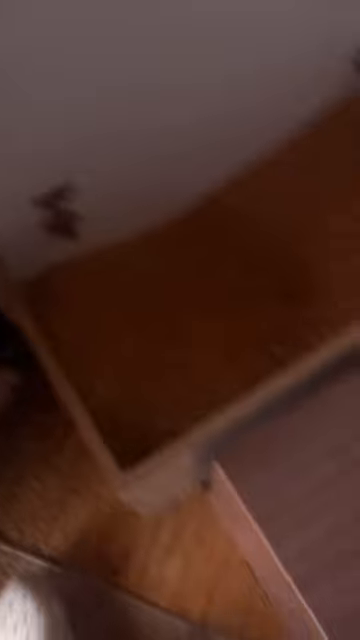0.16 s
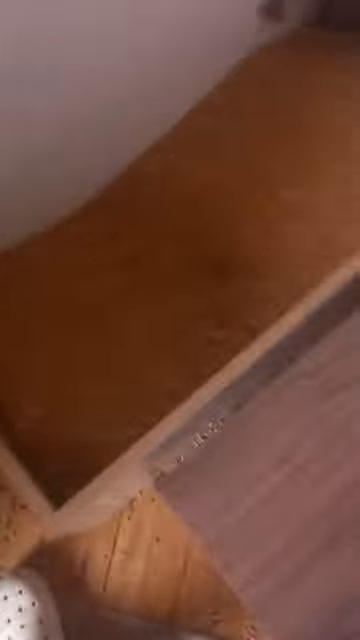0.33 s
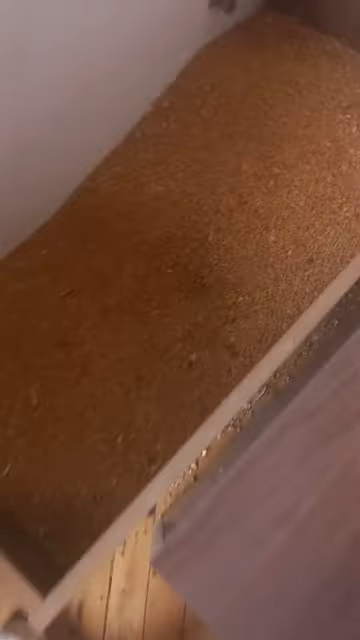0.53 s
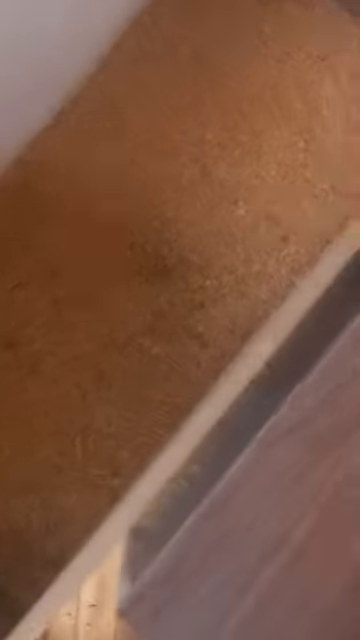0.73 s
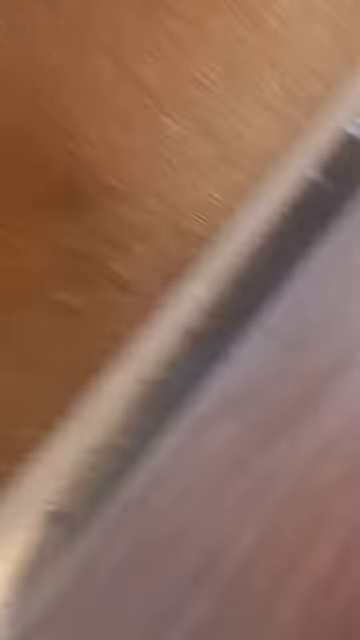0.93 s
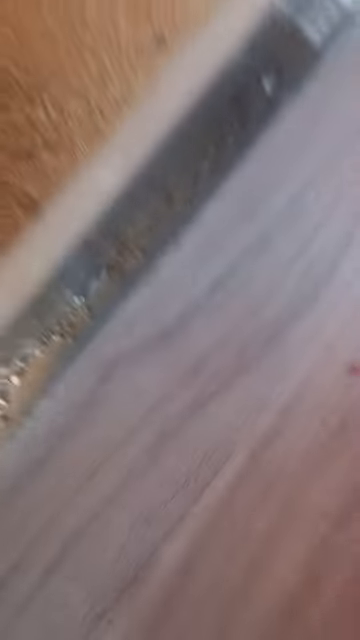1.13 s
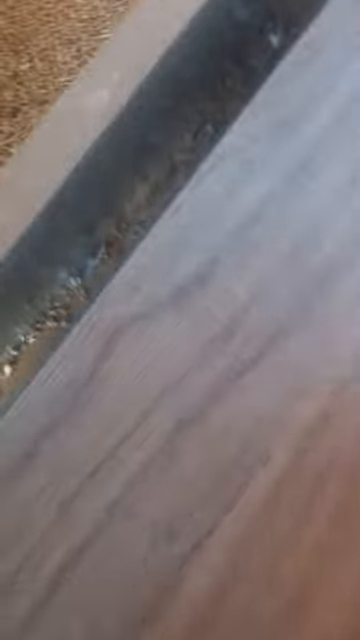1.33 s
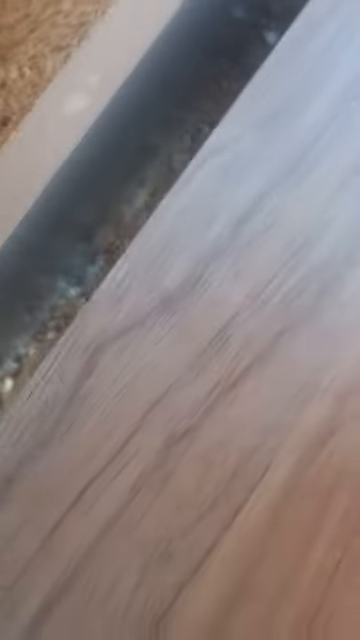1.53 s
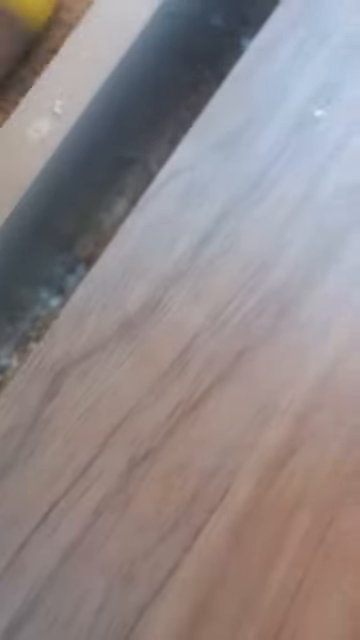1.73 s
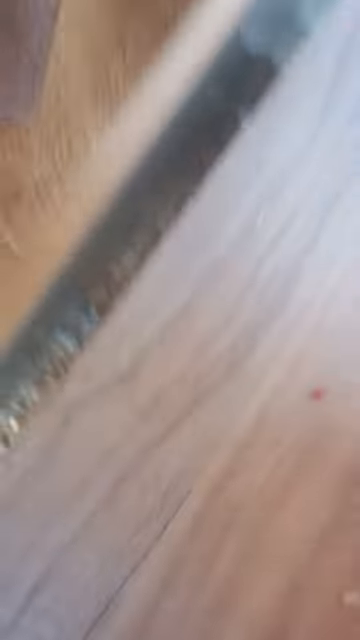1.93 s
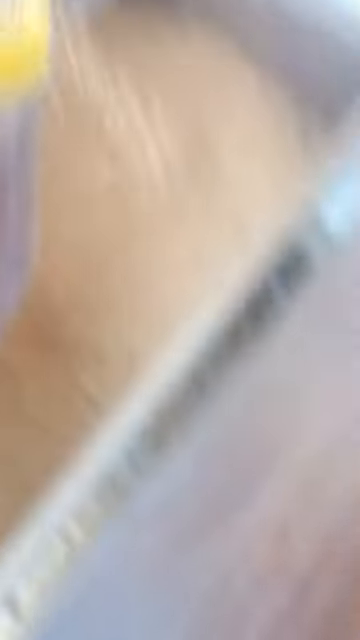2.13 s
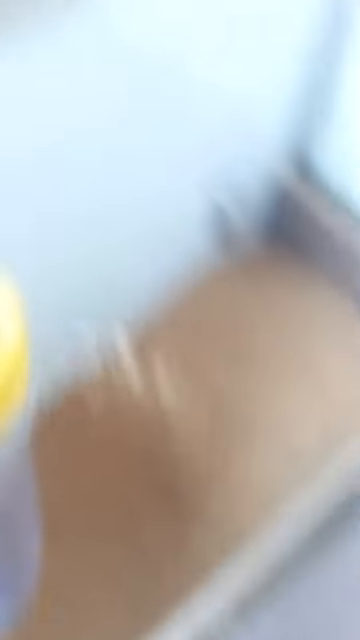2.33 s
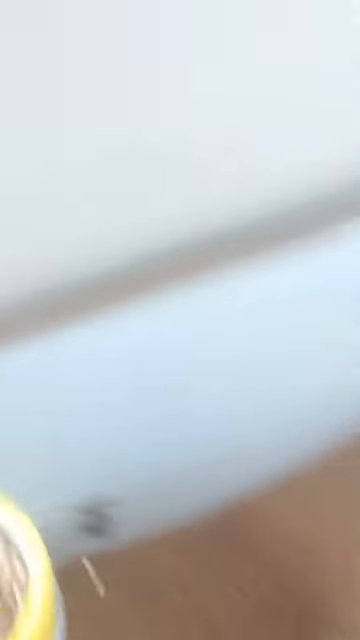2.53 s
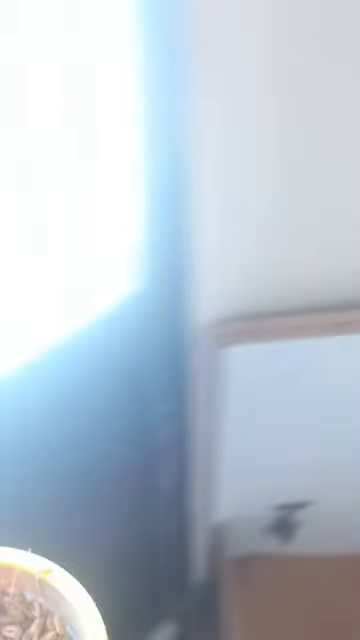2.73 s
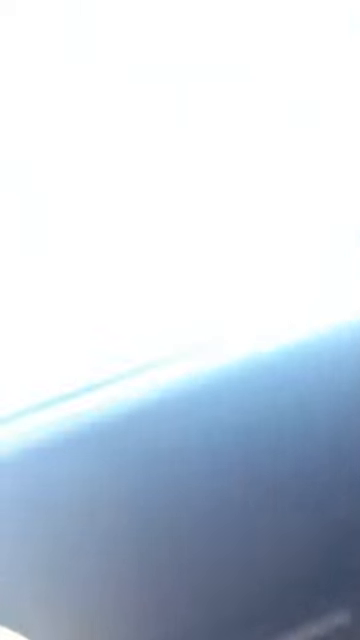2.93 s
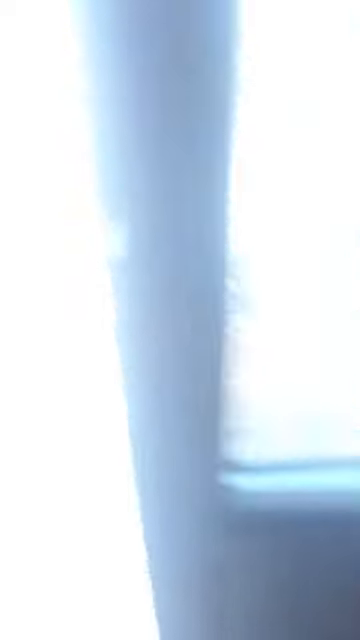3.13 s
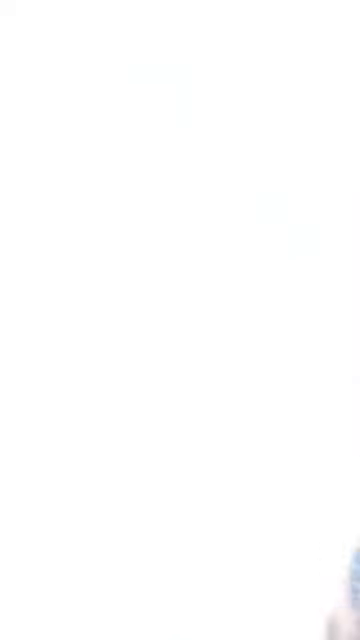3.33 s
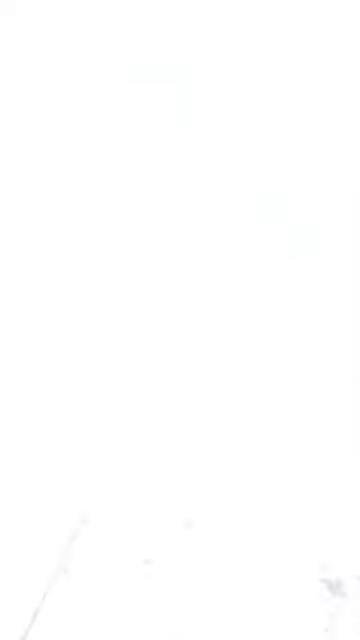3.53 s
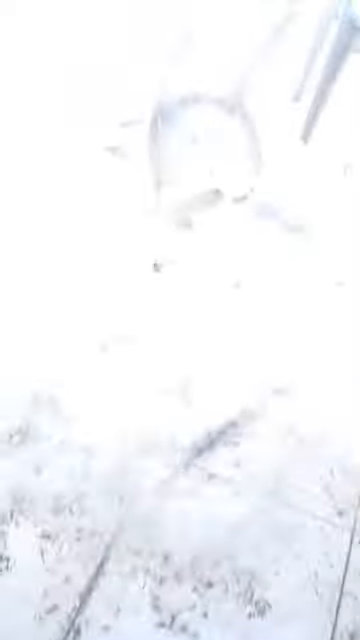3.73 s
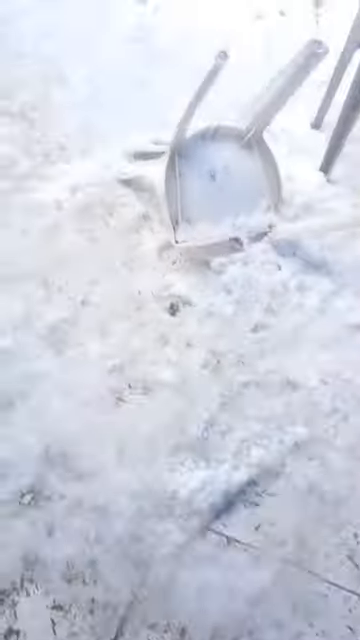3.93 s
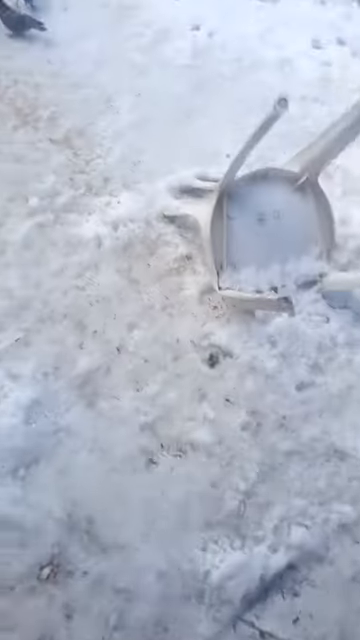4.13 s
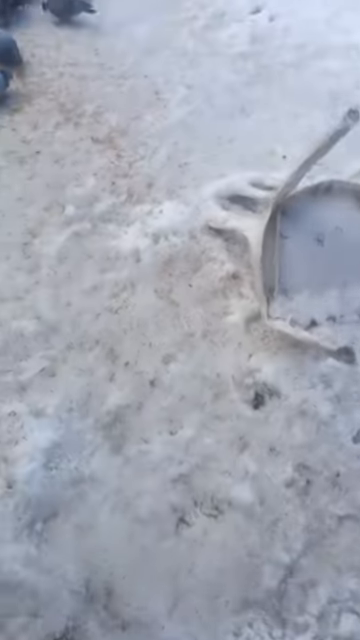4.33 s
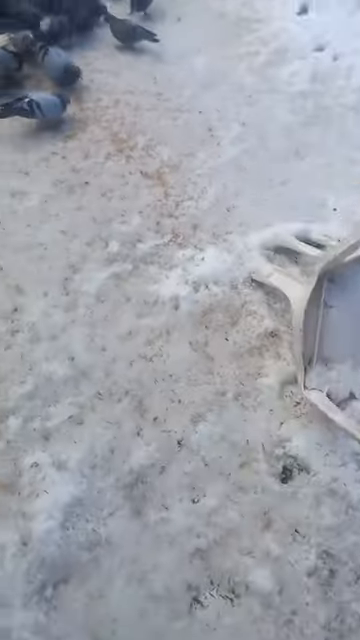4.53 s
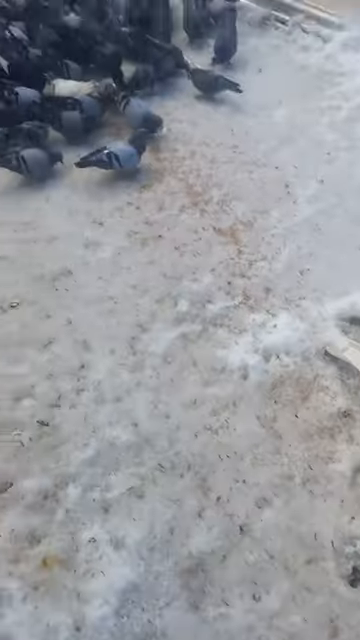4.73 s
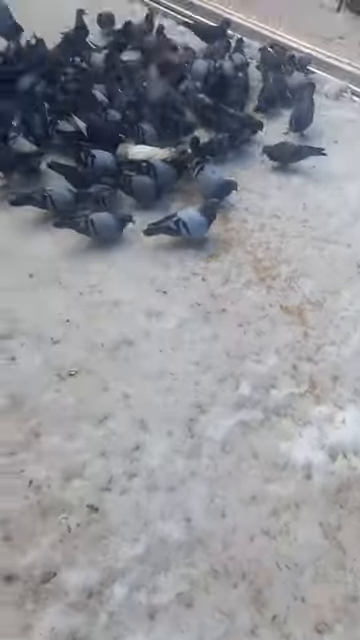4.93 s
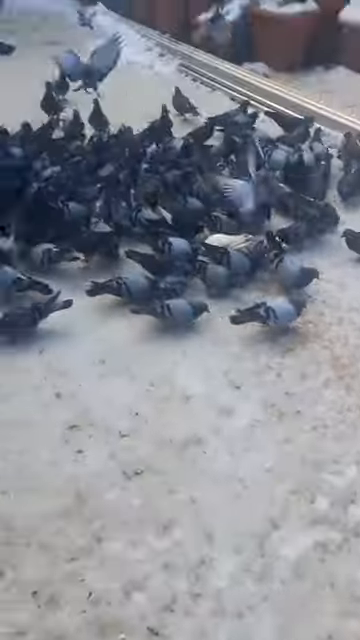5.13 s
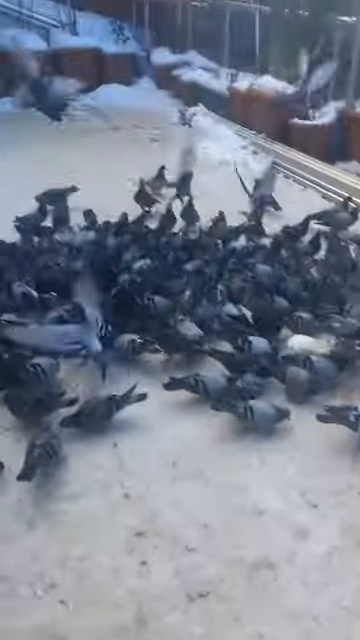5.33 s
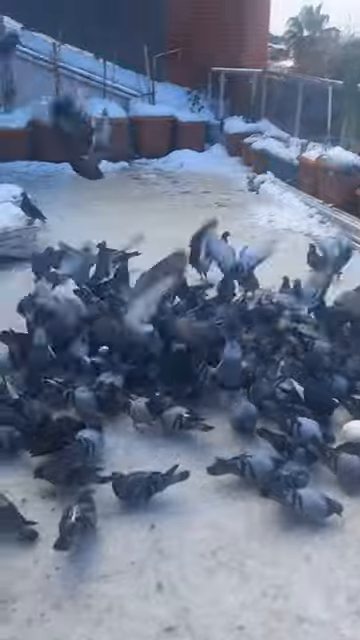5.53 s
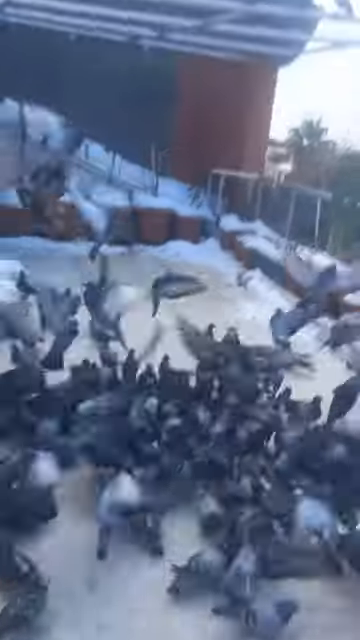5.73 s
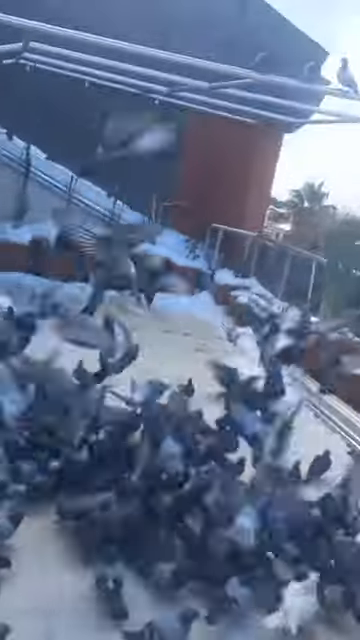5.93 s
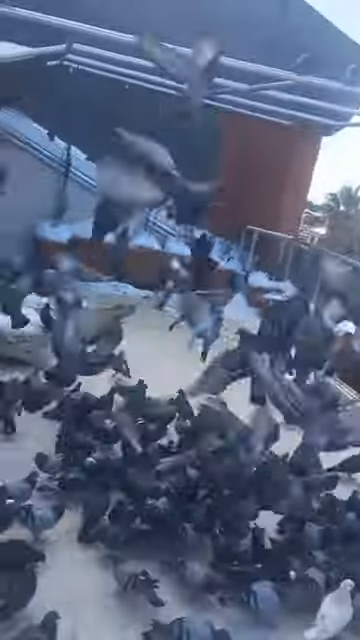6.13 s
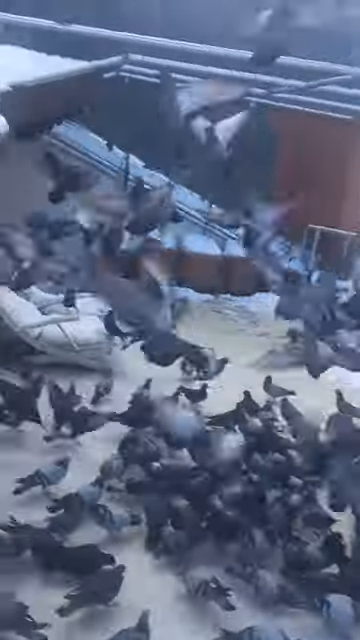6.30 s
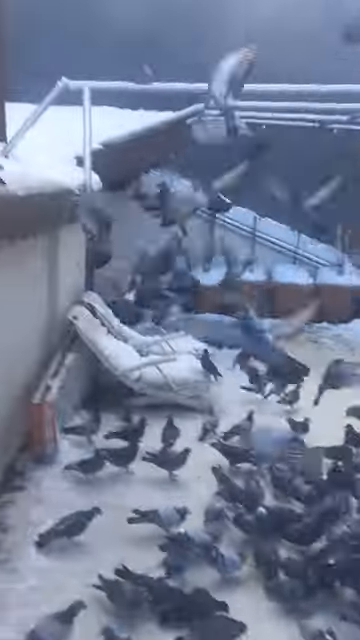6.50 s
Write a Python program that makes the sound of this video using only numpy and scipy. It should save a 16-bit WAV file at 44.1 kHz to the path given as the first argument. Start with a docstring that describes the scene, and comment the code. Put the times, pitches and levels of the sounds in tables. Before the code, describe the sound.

A cup scoops grain, and after footsteps and a door knock, a flock of pigeons bursts into flight on a terrace.

```python
"""Clothes brush, light knocks ring thinly and a wooden floor thuds; then a cup plunges into a bin of grain,
kernels hissing and rattling against its wall. The person holding the phone steps onto a snowy terrace,
the distant town grows louder and the door knocks once. Feeding pigeons stir, a few wings clap, then dozens
take off together: downstrokes thump the air, feathers swish and wing tips crack between house walls."""
import sys
import numpy as np
from scipy import signal
from scipy.fft import rfft, irfft, next_fast_len
from scipy.io import wavfile
from scipy.ndimage import uniform_filter1d

SR = 44100
rng = np.random.default_rng(int(sys.argv[2]) if len(sys.argv) > 2 else 0)


def persist_wave(psi):
    """Save psi, clipped to +-1, as 16-bit WAV."""
    counts = np.round(np.clip(psi, -1, 1) * 32767).astype(np.int16)
    wavfile.write(sys.argv[1], SR, np.atleast_2d(counts).T)


N = 293869
TIME = np.arange(N) / SR
KERNEL_WIDTH_HZ = 1000  # bandwidth of a rattling kernel

# midrange rub of feather vanes: freq_hz, level_db
RUB_COLOUR = [(150, -40), (400, -9), (800, -10.5), (1150, -6), (1560, -2.5), (2000, -5.5), (2700, -9.5),
              (4500, -10.5), (8000, -29.5)]
# bright top of quill cracks and hiss: freq_hz, level_db
BRIGHT_COLOUR = [(1500, -38.5), (3500, -6), (7000, -1.5), (10000, -5.5), (16000, -3)]


def flock(stir_s=4.42, alarm_s=5.378, spread_s=0.35, settle_s=0.45, stir_db=-42.5, burst_db=-20.5,
          flight_db=-28):
    """Every downstroke shoves air and swishes the vanes; quills flick, and airborne feathers whirr."""
    # body of the pushed air: freq_hz, level_db
    air_colour = [(21, -34), (35, -7.5), (98, 1.5), (145, 0.5), (194, -5.5), (299, 0.1), (385, -1.1),
                  (437, -7.5), (615, -6.5), (1110, -16), (1310, -16.5), (1600, -16), (1980, -21),
                  (2290, -27.5), (2600, -24.5), (3380, -42), (5720, -120)]
    # sheen of rustling feathers: freq_hz, level_db
    feather_colour = [(700, -18), (1200, 13.5), (1600, 11), (2050, 6.5), (2700, 5.5), (4000, 7.5),
                      (7000, 3.5), (10000, -1), (13000, 6), (16000, -3)]
    # alarm spreads through the shuffling birds, peaks, then eases into steady flight
    effort_db = (burst_db - stir_db) * ramp(alarm_s, spread_s)
    effort_db += (flight_db - burst_db) * ramp(alarm_s + spread_s, settle_s)
    lull_db = -6 * swell(5.15, 0.093)  # they freeze briefly before they go
    air_gain = undb(stir_db + effort_db)
    rustle_gain = undb(-51 + 0.76 * effort_db + lull_db)

    strokes = wingbeats()
    swish = stroke_envelope(strokes, swing_s=0.0065)
    pushes = ports(np.array([strokes, strokes * rng.standard_normal(N)]))
    pulses = unit(colour(pushes, air_colour)) * undb(-6)
    rush = unit(colour(noise() * swish, air_colour)) * undb(-4)
    vanes = unit(noise() * undb(4 * rng.standard_normal(N))) * swish * undb(-1)
    quills = noise() * stroke_envelope(strokes * (rng.random(N) < .3), swing_s=0.0029) * undb(-7)
    feathers = colour(vanes + quills, feather_colour) * undb(3 * np.array([walk(25), walk(25)]))
    wings = air_gain * (pulses + rush) + rustle_gain * feathers

    flutter = noise() * stroke_envelope(wingbeats(count=4), swing_s=0.009)
    whirr = unit(resonate_twice(flutter, hz=378, width=146)) * undb(-36.5)
    airborne = ramp(alarm_s + spread_s / 2, spread_s)
    return wings * ramp(stir_s, 0.065) + whirr * airborne


def wingbeats(beat_hz=8.5, spread_db=2.5, count=30):
    """One impulse for each downstroke; every bird has its own tempo and distance."""
    strokes = np.zeros(N)
    for bird in range(count):
        tempo, near, start = rng.standard_normal(3)
        uneven, force = rng.standard_normal((2, 90))
        bird_hz = beat_hz * np.exp(.13 * tempo)
        times = start % 1 - 1 + np.cumsum(1 + .06 * uneven) / bird_hz
        heard = (times > 0) & (times < TIME[-1])
        strokes[(times[heard] * SR).astype(int)] += undb(spread_db * (near + force) / 2)[heard]
    return strokes


def stroke_envelope(strokes, swing_s):
    """Each stroke swells quickly and fades; their powers add."""
    age = TIME[:SR // 4] / swing_s
    power = signal.fftconvolve(strokes ** 2, age * np.exp(-age))[:N]
    return unit(np.sqrt(np.maximum(power, 0)))


def wing_claps(pop_hz=1570, scatter_octaves=.45, firm_above_db=-20, snap_s=0.00074):
    """Wings meet: trapped air pops hollowly, the vanes rub, and the quills add a short bright crack."""
    # single claps: start_s, body_db, crack_db, pan_db, fade_s
    clap_hits = [(4.4831, -31.5, -34.5, 7, 0.0067), (4.589, -49, -32.5, 6, .004),
                 (4.6194, -32.5, -36.5, 4.5, 0.012), (4.705, -27, -39, 4, 0.0063),
                 (4.7205, -37, -30.5, 4, 0.0059), (4.778, -29, -37, -3, .002),
                 (4.785, -22.5, -44, -4, 0.0037), (4.794, -23.5, -44, 10, .002),
                 (4.843, -30.5, -32.5, 3, 0.0036), (4.871, -27, -52, 0, .004), (5.1, -26.5, -46, 1, 0.0025),
                 (5.1928, -33, -50, -4, 0.0029), (5.271, -27, -35.5, -1, 0.0034),
                 (5.3462, -21, -33, 6, 0.0023), (5.354, -19.5, -28.5, -1, 0.0025),
                 (5.4443, -24.5, -37, 0, 0.004), (5.474, -21.5, -38, -14, 0.0028),
                 (5.4816, -15.5, -31, 0, 0.0077), (5.5638, -21.5, -39, 9, 0.011),
                 (5.571, -17.5, -20.5, -4, 0.0056), (5.649, -22, -36, 0, 0.0022),
                 (5.663, -21, -38, 1, .002), (5.6878, -17.5, -22.5, 1, 0.007), (5.787, -21, -30, -6, .002),
                 (5.807, -18.5, -17, 1, 0.003), (5.846, -16, -19, -4, 0.0036), (5.881, -21, -23, 2, .0015),
                 (5.9122, -20, -15, -1, 0.0037), (5.952, -6.5, -11.5, -1, 0.0026),
                 (6.0788, -17.5, -22, -1, 0.0055), (6.1188, -20, -31, -1, 0.0051),
                 (6.174, -25, -34, 3, .002), (6.232, -17, -39, 1, 0.002), (6.4038, -18.5, -38, -4, 0.0037),
                 (6.4331, -20.5, -24, 3, 0.0044), (6.535, -16, -25.5, 1.5, 0.0063),
                 (6.6038, -15.5, -16.5, 3.5, 0.0032)]
    out = np.zeros((2, N))
    for s, body_db, crack_db, pan_db, fade in clap_hits:
        glancing = min(undb(firm_above_db - body_db), 1)  # glancing claps vary most in pitch
        hz = pop_hz * 2 ** (scatter_octaves * rng.uniform(-1, 1) * glancing)
        firm_db = 0.23 * max(body_db - firm_above_db, 0)  # a harder clap traps more air
        pop = puff(hz, width=920) * undb(firm_db - 3)
        rub = crest(colour(burst(fade), RUB_COLOUR)) * undb(-5)
        quills = burst(fade) + undb(6) * burst(snap_s)
        crack = crest(colour(quills, BRIGHT_COLOUR)) * undb(crack_db + 5)
        add(out, s, (undb(body_db) * (pop + rub) + crack) * pan(pan_db))
    return out


def wing_whumps(churn_db=-11, churn_s=0.0073, pan_scatter_db=2):
    """A near wing slams down: one hollow whump, then the air churns briefly behind it."""
    # downstrokes of the nearest birds: start_s, level_db, pitch_hz
    downstrokes = [(5.569, -24, 564), (5.58, -24, 348), (5.663, -25, 850), (5.676, -22, 775),
                   (5.712, -17, 384), (5.727, -17, 700), (5.745, -25, 845), (5.751, -18, 348),
                   (5.844, -20, 356), (5.854, -21, 420), (5.8823, -18, 650), (5.911, -19, 370),
                   (5.9535, -18, 750), (6.034, -27, 330), (6.158, -22, 382), (6.2316, -15.5, 347),
                   (6.356, -18, 665), (6.423, -20.5, 397), (6.458, -25, 380), (6.51, -28, 370),
                   (6.5345, -29, 750), (6.6057, -20, 740)]
    out = np.zeros((2, N))
    for s, db, hz in downstrokes:
        churn = crest(resonate(burst(churn_s), hz, width=hz))
        whump = puff(hz, width=hz / 2) + undb(churn_db) * churn
        add(out, s, whump * undb(db) * pan(pan_scatter_db * rng.standard_normal()))
    return out


def wing_sweeps(roughness_db=3):
    """A near wing drags its feathers through the air and over its neighbours."""
    # close passes: middle_s, level_db, half_length_s, treble_db, pan_db
    passes = [(4.789, -34, 0.0082, -5, -5.5), (5.339, -35, 0.021, -5.5, -3), (5.42, -55.5, 0.044, 12.5, -4),
              (5.613, -43.5, 0.037, 9.5, -2), (5.728, -45, 0.028, 14, 0), (5.785, -37, 0.022, 19, 3.5),
              (5.967, -35, 0.0088, 7, -5), (6.031, -40, 0.035, 4, -6), (6.343, -30.5, 0.0079, -1, 1),
              (6.404, -44, 0.0053, 9.5, 0), (6.633, -31, 0.016, -15, -3)]
    rasp = noise() * undb(roughness_db * np.repeat(rng.standard_normal(N // 32 + 1), 32)[:N])
    body = unit(colour(rasp, RUB_COLOUR))
    hiss = unit(colour(rasp, BRIGHT_COLOUR))
    return sum(undb(db) * swell(s, half) * (body + undb(treble_db) * hiss) * pan(pan_db)
               for s, db, half, treble_db, pan_db in passes)


def thumps(shove_db=22):
    """Feet, then air from near wings, thump dully: one shove and a short churn."""
    # bass hits: start_s, level_db, fade_s, upper_edge_hz
    bass_hits = [(2.707, -38, .008, 376), (3.696, -23.5, 0.0039, 1000), (3.732, -22, 0.003, 610),
                 (3.803, -31.5, .04, 400), (3.868, -33, .015, 198), (4.11, -34, .02, 420),
                 (4.485, -28.5, 0.1, 292), (5.491, -24.5, .025, 170), (5.568, -22.5, 0.02, 253),
                 (5.748, -14.5, 0.02, 320), (5.866, -17.5, 0.02, 220), (5.882, -13, 0.0053, 400),
                 (5.918, -16, 0.0088, 170), (6.02, -18.5, 0.011, 170), (6.23, -16.5, 0.0065, 300)]
    out = np.zeros((2, N))
    for s, db, fade, edge_hz in bass_hits:
        push = burst(fade) + undb(shove_db) * signal.unit_impulse(8192)
        thud = colour(push, [(80, -5), (130, 0), (edge_hz, -1)])
        add(out, s, crest(thud) * undb(db))
    return out


def grain_scoop(build_db=7, plunge_s=0.074, loose_hits_per_s=2200, packed_hits_per_s=13000):
    """A cup digs into grain: colliding kernels ring its wall; packed ones rumble, loose ones rattle."""
    # grain runs in, then the excess spills back: start_s, level_db, swell_s, hold_s, release_s
    pours = [(1.212, -30, 0.27, 0.16, 0.081), (1.792, -44, 0.2, 0.37, 0.18)]
    # hiss of running grain: freq_hz, level_db
    grain_colour = [(530, -37), (900, -6.5), (1500, -4), (2400, -4.5), (2750, -4.5), (3200, -3), (4200, -1),
                    (7500, 0), (10100, -2.5), (12600, 1.5), (16000, 0.5)]
    # large to small kernels: pitch_hz
    kernel_pitches = [5150, 7100, 8300, 11800]
    # ring of the plastic wall: pitch_hz, width_hz, level_db
    cup_modes = [(1660, 100, -13), (2255, 49, 4.5), (3200, 160, 0.5), (3960, 790, -2)]
    # bright attack as the cup digs in: freq_hz, level_db
    plunge_colour = [(1700, -10), (2700, -25), (3500, -16), (4600, -10), (7500, -0.5), (10000, -1),
                     (16000, -6.5)]
    # hollow rumble of the cup: freq_hz, level_db
    cup_colour = [(70, -44), (170, 7.5), (300, 0), (450, 5), (650, -6), (1000, -18), (1600, -40)]
    flow = np.zeros(N)
    for s, db, rise, hold, release in pours:
        build = undb(db - build_db * (1 - ramp(s, rise)))
        tail = np.exp(-np.maximum(TIME - s - rise - hold, 0) / release)
        flow += ramp(s, 0.0042) * build * tail
    touch_s, full_db = pours[0][:2]
    packed = np.minimum(flow / undb(full_db), 1)
    rate = loose_hits_per_s + packed_hits_per_s * packed
    hits = ports(rng.standard_normal((2, N)) * (rng.random(N) < rate / SR) / np.sqrt(rate))
    kernels = unit(colour(hits, grain_colour)) * undb(-1.4 * (1 - packed) * walk(110))
    rattle = sum(resonate(kernels, hz, KERNEL_WIDTH_HZ) * undb(3 * walk(45.2)) for hz in kernel_pitches)
    grain = kernels + undb(3) * packed * ring(kernels, cup_modes) + undb(-10) * rattle
    digging = 1 - ramp(touch_s + plunge_s / 2, plunge_s / 2)
    plunge = unit(colour(noise(), plunge_colour)) * undb(7) * digging
    hollow = unit(colour(noise(), cup_colour)) * undb(-39) * packed ** 1.59
    return flow * (grain + plunge) * pan(5) + hollow * pan(3.5)


def kernel_drops(fade_s=0.014, rattle_hz=8200):
    """Small clumps of kernels land with a short bright rattle."""
    # landings: start_s, level_db
    landings = [(1.923, -33), (1.948, -37), (2.009, -25.5), (2.023, -28), (2.072, -27.5), (2.088, -31),
                (2.122, -41), (2.245, -31), (2.291, -29.5), (2.386, -37), (2.868, -36.5), (3.116, -36),
                (3.779, -28.5)]
    out = np.zeros((2, N))
    for s, db in landings:
        flick = colour(burst(fade_s), [(5300, -18), (10600, -16.5), (16000, -8)])
        rattle = resonate(flick, rattle_hz * rng.uniform(.85, 1.2), KERNEL_WIDTH_HZ)
        add(out, s, crest(flick + undb(1) * rattle) * undb(db) * pan(4.5))
    return out


def cup_taps(contact_s=0.00077):
    """The cup strikes the edge of the bin with a short dry knock."""
    # contacts: start_s, level_db
    contacts = [(1.8085, -33), (1.8138, -27.5)]
    # tone of the tap: pitch_hz, width_hz, level_db
    tap_modes = [(1670, 350, -8), (2220, 570, 9), (4400, 530, -19)]
    out = np.zeros((2, N))
    for s, db in contacts:
        add(out, s, crest(ring(burst(contact_s), tap_modes)) * undb(db))
    return out


def light_knocks():
    """Light knocks with a thin ring near 1.6 kHz."""
    # touches: start_s, level_db, fade_s
    touches = [(0.526, -46.5, 0.022), (.673, -40, 0.0084), (.703, -45.5, .03), (0.737, -46, 0.031)]
    # thin ring: pitch_hz, width_hz, level_db
    thin_modes = [(1560, 210, 4), (2540, 440, -16)]
    out = np.zeros((2, N))
    for s, db, fade in touches:
        add(out, s, crest(ring(burst(fade), thin_modes)) * undb(db))
    return out


def door_knock(contact_s=0.0032, ring_s=0.048, ring_db=-20):
    """The door knocks, rebounds and rings on briefly in its frame."""
    # first touch, blow and rebounds: start_s, level_db
    impacts = [(3.419, -29), (3.4237, -14.5), (3.4292, -18.5), (3.437, -21.5), (3.507, -37)]
    # ring of the door: pitch_hz, width_hz, level_db
    door_modes = [(400, 100, -2.5), (756, 100, -0.5), (1010, 390, 2), (1520, 160, 6.5), (1720, 90, -20),
                  (2220, 220, -16), (4400, 1600, -16)]
    out = np.zeros((2, N))
    for s, db in impacts:
        contact = burst(contact_s) + undb(ring_db) * burst(ring_s)
        blow = colour(contact, [(150, 6), (2000, -1), (5000, -8), (12000, -25)])
        add(out, s, crest(ring(blow, door_modes)) * undb(db))
    return out


def footsteps(rise_s=0.007, sole_db=-9, sole_s=0.024):
    """The wooden floor booms for a few cycles under each footfall; the sole adds a dull pat."""
    # heels and soles landing: start_s, level_db, pitch_hz, pan_db
    footfalls = [(0.738, -33, 100, 3), (0.772, -38, 80, 2), (2.573, -41.5, 110.6, -12),
                 (2.604, -41.5, 126, -21), (2.656, -34.5, 79, -11), (2.697, -37.5, 108, -19),
                 (2.731, -39.5, 84, -18), (2.863, -43, 95.5, -16)]
    out = np.zeros((2, N))
    age = TIME[:8192]
    for s, db, hz, pan_db in footfalls:
        boom = age / rise_s * np.exp(1 - age / rise_s) * np.sin(2 * np.pi * hz * age)
        pat = crest(colour(burst(sole_s), [(120, 4), (260, -2), (500, -20)]))
        add(out, s, (boom + undb(sole_db) * pat) * undb(db) * pan(pan_db))
    return out


def scuffs(skirt_db=-16):
    """Brief scuffs of shoes, and later of claws, each in one broad band."""
    # scrapes: start_s, level_db, centre_hz, fade_s
    scrapes = [(.247, -44.5, 1110, 0.017), (0.713, -43, 990, 0.037), (2.822, -42.5, 1390, 0.15),
               (3.2145, -30.5, 3550, 0.0032), (3.668, -29.5, 1190, 0.0054), (3.72, -31, 2040, 0.007),
               (3.781, -29, 1170, 0.004), (3.872, -31.5, 450, 0.016), (4.114, -33.5, 2600, .003),
               (4.118, -31, 1030, 0.0037), (4.588, -23.5, 1000, 0.0026), (4.6193, -25.5, 3900, 0.0018),
               (5.1915, -30, 2880, 0.0034)]
    out = np.zeros((2, N))
    for s, db, hz, fade in scrapes:
        rub = colour(burst(fade), [(hz / 2, skirt_db), (hz, 0), (hz * 2, skirt_db)])
        add(out, s, crest(rub) * undb(db))
    return out


def clothes(flutter_db=2.6, pivot_hz=2500):
    """Cloth brushes softly, swelling with each movement; some rubs are duller than others."""
    # movements: middle_s, level_db, half_length_s, tilt_db_per_octave
    movements = [(0.39, -58, 0.16, -4), (1.146, -72, 0.063, -2), (2.198, -49.5, 0.18, -6.5),
                 (3.09, -51, 0.044, -6), (3.261, -51.5, 0.027, 3.5), (3.732, -43, 0.071, -1.5),
                 (3.87, -43.5, 0.12, -0.5), (4.164, -45.5, 0.11, -1.5)]
    # rubbing fabric: freq_hz, level_db
    cloth_colour = [(500, -11.5), (1000, -6), (1650, -1.5), (1880, -5), (2100, 2), (2700, -1.5), (3700, 0),
                    (4400, 1), (5300, 3.5), (6300, -6), (9200, -13), (16000, -8)]
    out = np.zeros((2, N))
    for s, db, half, tilt in movements:
        tilted = [(hz, band_db + tilt * np.log2(hz / pivot_hz)) for hz, band_db in cloth_colour]
        out += unit(colour(noise(), tilted)) * undb(db) * swell(s, half)
    return out * undb(flutter_db * walk(40))


def handling():
    """Fingers creep over the phone's case with a low mutter."""
    # shifts of grip: middle_s, level_db, half_length_s, pitch_hz, pan_db
    shifts = [(1.179, -60.5, 0.09, 275, -9), (2.732, -53.5, 0.029, 286, -10),
              (2.837, -50.5, 0.026, 255, -1), (3.102, -46, 0.039, 273, -1), (3.238, -43.5, 0.047, 307, 1.5)]
    # tone of the mutter: pitch_ratio, level_db
    mutter_shape = [(0.55, -10.5), (1, 0.5), (1.5, -14.5), (3, -17), (6, -20)]
    out = np.zeros((2, N))
    for s, db, half, hz, pan_db in shifts:
        mutter = colour(noise(), [(hz * ratio, band_db) for ratio, band_db in mutter_shape])
        out += unit(mutter) * undb(db) * swell(s, half) * pan(pan_db)
    return out


def pings():
    """Faint, thin pings sound among the pecking birds."""
    # glints: middle_s, level_db, half_length_s
    glints = [(4.987, -56, 0.006), (5.024, -52, 0.0087), (5.09, -49, .005), (5.23, -47.5, .007)]
    # a thin ping near 7.9 kHz with a faint higher whistle: pitch_hz, width_hz, level_db
    ping_bands = [(7880, 160, 0), (12700, 180, -2)]
    tone = unit(ring(ring(noise(), ping_bands), ping_bands))
    return tone * sum(undb(db) * swell(s, half) for s, db, half in glints)


def ambience(doorway_s=2.5, crossing_s=0.75):
    """Low rumble at the phone, the town's murmur and a thin hiss, all wavering and louder outside."""
    # low rumble: freq_hz, level_db
    rumble_colour = [(25, -19), (40, -21), (65, -5.5), (107, 0), (150, -12), (250, -24)]
    # midrange murmur of the town: freq_hz, level_db
    murmur_colour = [(120, -12), (280, 3), (400, -2.5), (600, -5), (1100, -10.5), (1600, -12),
                     (2000, -15.5), (2800, -15), (5200, -20.5), (8000, -47)]
    outdoors = ramp(doorway_s, crossing_s)
    rumble_db = -56 + 8 * outdoors
    rumble_db -= 13 * (1 - ramp(0, 0.56))  # swells in at first
    rumble_db -= 5 * swell(3.18, 0.24)  # dips in the doorway
    rumble = unit(colour(noise(), rumble_colour)) * undb(rumble_db + 3 * walk(6.9))
    rumble *= pan(7) ** (1 - outdoors)  # leans left indoors
    murmur = unit(colour(noise(), murmur_colour)) * undb(-57.5 + 8 * outdoors + .8 * walk(14))
    hiss = unit(colour(noise(), BRIGHT_COLOUR)) * undb(-65.5 + 8.5 * outdoors + walk(25.7))
    return rumble + murmur + hiss


def wall_echoes(x, wet_db=-13, t60_s=0.17, slap_s=.018, slap_db=-13):
    """The nearest wall returns a slap; the others leave a short dull tail."""
    age = TIME[:SR // 2]
    scatter = noise(len(age)) * undb(-60 * age / t60_s) * (age > .004)
    tail = colour(scatter, [(100, 9), (1800, 0.5), (6000, -3.5), (16000, -15)])
    response = undb(wet_db) * tail / np.sqrt(np.sum(tail ** 2) / 2)
    response[:, int(slap_s * SR)] += undb(slap_db)
    return x + signal.fftconvolve(x, response, axes=1)[:, :N]


def puff(hz, width):
    """A squeezed pocket of air rings for a cycle or two; peak 1."""
    x = resonate_twice(signal.unit_impulse(8192), hz, width)
    return x / np.abs(x).max()


def burst(fade_s):
    """A noisy contact that dies away."""
    return noise(8192) * np.exp(-TIME[:8192] / fade_s)


def noise(size=N):
    """White noise as the two microphone ports hear it."""
    return unit(ports(rng.standard_normal((2, size))))


def ports(mid_side, apart_hz=1300, bass_side_db=-14):
    """Two microphone ports hear long waves alike and short waves unrelated."""
    mid, side = mid_side
    hz = np.fft.rfftfreq(len(side), 1 / SR)
    share = np.minimum(undb(bass_side_db) + hz ** 2 / (hz ** 2 + apart_hz ** 2), 1)
    side = irfft(rfft(side) * share, len(side))
    return np.array([mid + side, mid - side])


def colour(x, points):
    """Causal EQ through (freq_hz, level_db) points, falling steeply beyond both ends."""
    size = next_fast_len(x.shape[-1] + 4096, True)
    size += size % 2
    octave = np.log2(np.maximum(np.fft.rfftfreq(size, 1 / SR), 1))
    hz, db = np.transpose(points)
    beyond = np.abs(octave - np.clip(octave, np.log2(hz[0]), np.log2(hz[-1])))
    curve_db = np.interp(octave, np.log2(hz), db) - 20 * np.minimum(beyond, 2)
    cepstrum = irfft(np.log(undb(curve_db)))
    cepstrum[1:size // 2] *= 2  # fold to minimum phase, so attacks stay sharp
    cepstrum[size // 2 + 1:] = 0
    return irfft(rfft(x, size) * np.exp(rfft(cepstrum)))[..., :x.shape[-1]]


def resonate(x, hz, width):
    """One resonance with gain 1 at its centre; width in Hz."""
    return signal.lfilter(*signal.iirpeak(hz, hz / width, fs=SR), x)


def resonate_twice(x, hz, width):
    """A resonance with steeper skirts."""
    return resonate(resonate(x, hz, width), hz, width)


def ring(x, modes):
    """Sum of resonances (pitch_hz, width_hz, level_db)."""
    return sum(undb(db) * resonate(x, hz, width) for hz, width, db in modes)


def ramp(start_s, length_s):
    """Rise from 0 to 1."""
    return np.clip((TIME - start_s) / length_s, 0, 1)


def swell(middle_s, half_s):
    """A bell-shaped rise and fall."""
    return np.exp(-((TIME - middle_s) / half_s) ** 2 / 2)


def walk(rate_hz):
    """Random drift with a spread near 1."""
    knots = rng.standard_normal(1024)
    return np.interp(TIME * rate_hz, np.arange(len(knots)), knots)


def pan(db):
    """Stereo gains, with the left db above the right."""
    return undb(np.array([[db], [-db]]) / 2)


def undb(db):
    """Decibels to gain."""
    return 10 ** (np.asarray(db) / 20)


def unit(x):
    """Scale to rms 1."""
    return x / np.sqrt(np.mean(x ** 2) + 1e-18)


def crest(x):
    """Scale so that the loudest few milliseconds peak near 1."""
    power = uniform_filter1d(np.mean(x ** 2, axis=0), 128)
    return x / (2 * np.sqrt(power.max()))


def add(out, s, x):
    """Mix x into out from time s."""
    i = int(np.clip(s * SR, 0, N - 1))
    out[:, i:i + x.shape[1]] += x[:, :N - i]


def scene():
    """Sharp sounds echo off the walls; the flock's wash, close foley and ambience stay dry."""
    sharp = wing_claps() + scuffs() + cup_taps() + light_knocks() + kernel_drops() + door_knock()
    echoing = wall_echoes(sharp + wing_sweeps() + pings())
    birds = flock() + wing_whumps()
    close = grain_scoop() + clothes() + handling() + footsteps() + thumps()
    return echoing + birds + close + ambience()


def record(dry, low_cut_hz=56, high_cut_hz=15850, ceiling=0.85):
    """The phone's ports ring slightly; it rounds loud peaks and drops the deep bass and the very top."""
    # narrow resonances of the case and ports: pitch_hz, width_hz, level_db
    port_modes = [(367, 14, -15), (1581, 137, 1.5), (2046, 34, 2.5), (8200, 20, 1)]
    low_cut = signal.butter(4, low_cut_hz, "high", fs=SR, output="sos")
    high_cut = signal.ellip(10, .2, 70, high_cut_hz, fs=SR, output="sos")
    heard = signal.sosfilt(low_cut, dry + ring(dry, port_modes))
    rounded = ceiling * np.tanh(heard / ceiling)
    return signal.sosfilt(high_cut, rounded)


dry = scene()
out = record(dry)
persist_wave(out)
```